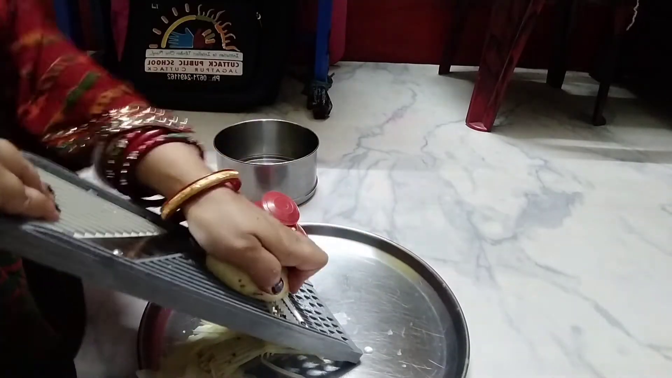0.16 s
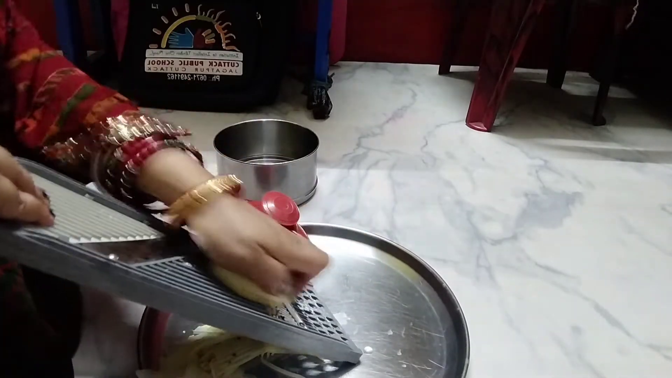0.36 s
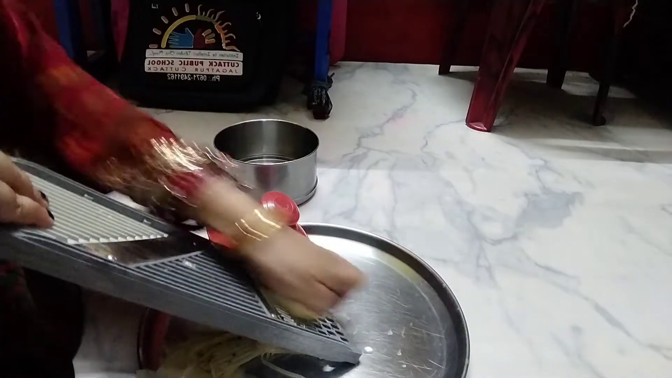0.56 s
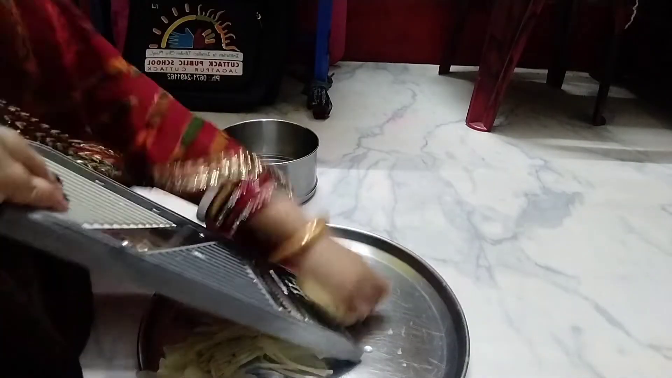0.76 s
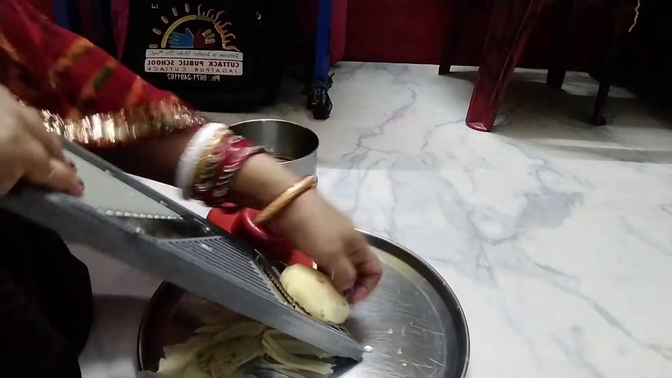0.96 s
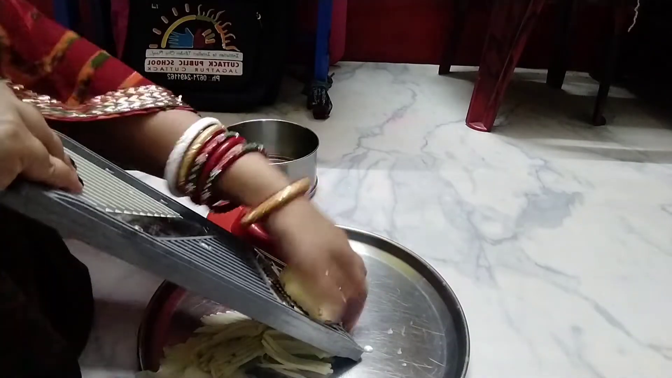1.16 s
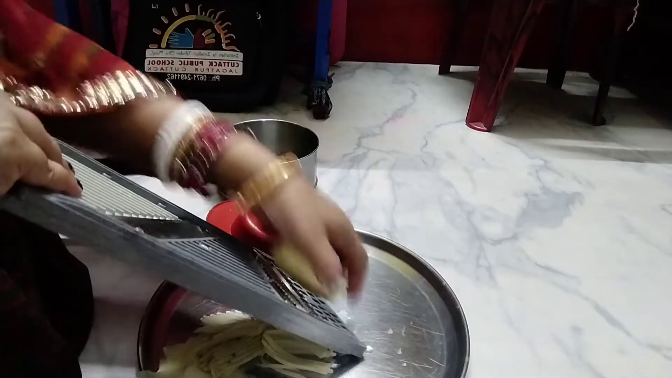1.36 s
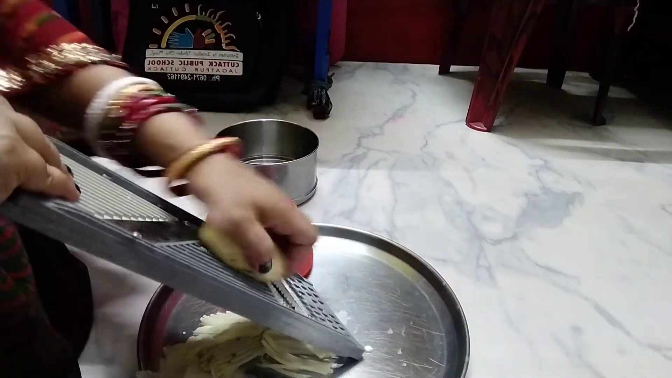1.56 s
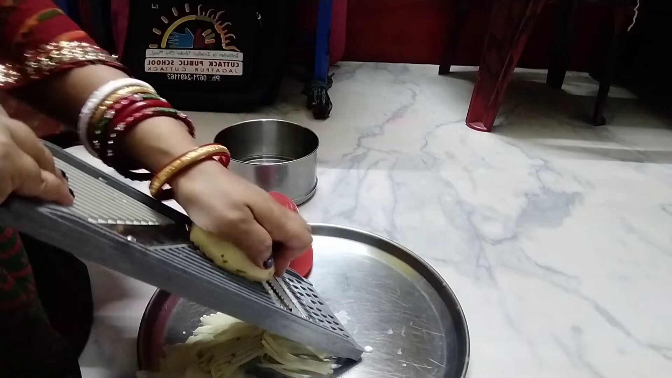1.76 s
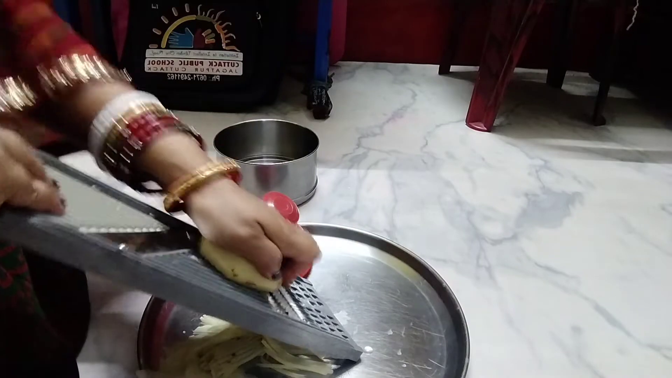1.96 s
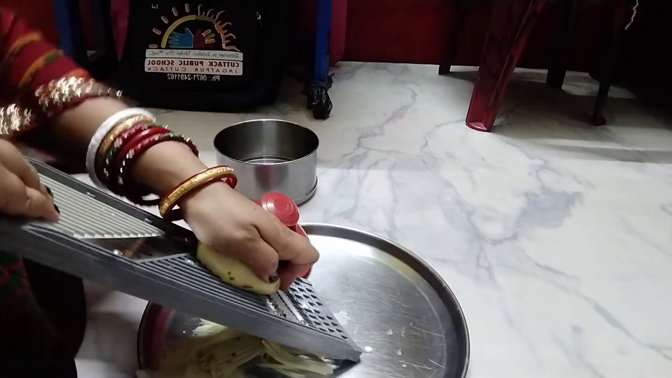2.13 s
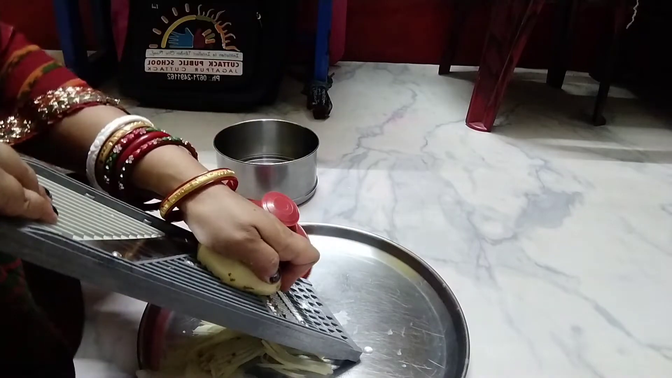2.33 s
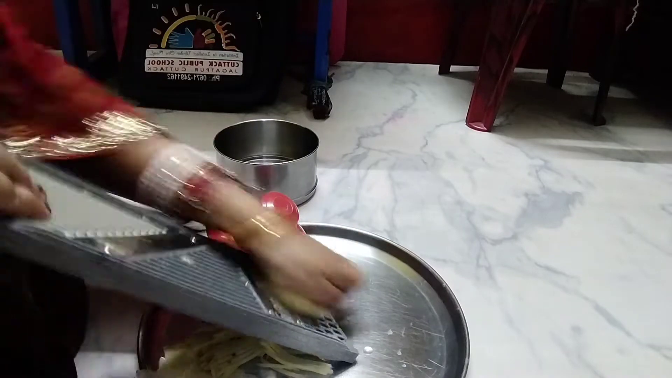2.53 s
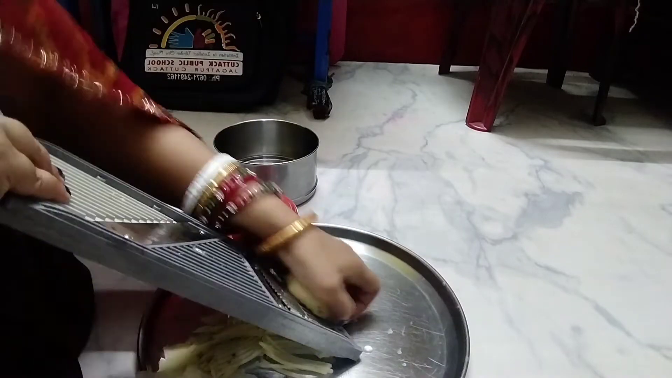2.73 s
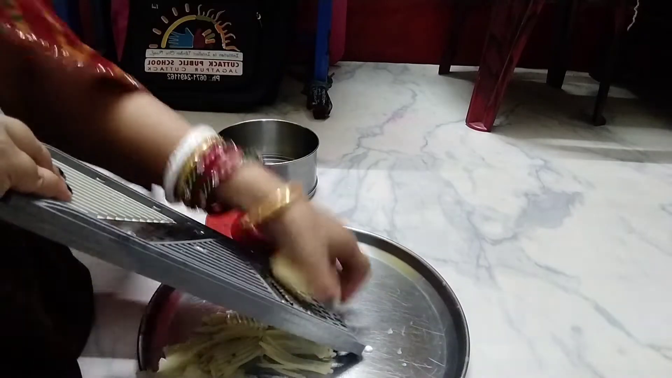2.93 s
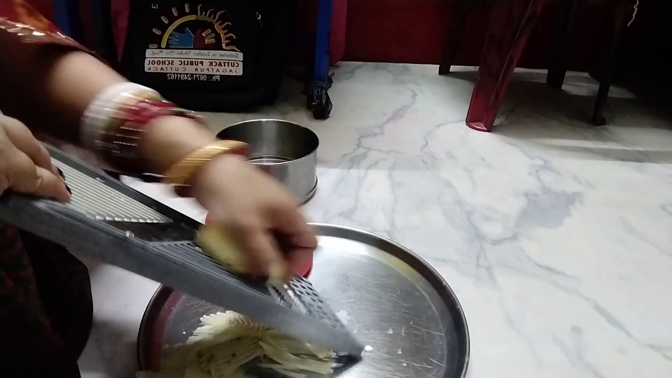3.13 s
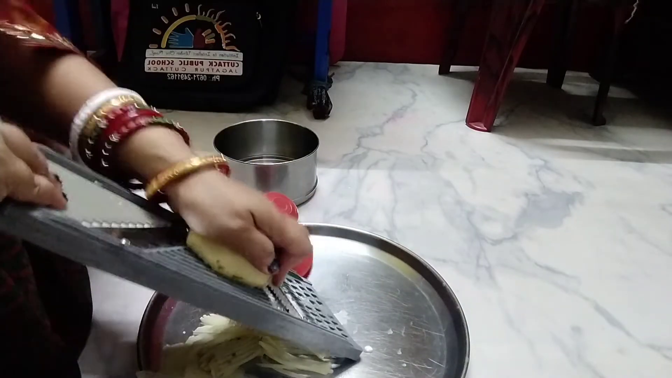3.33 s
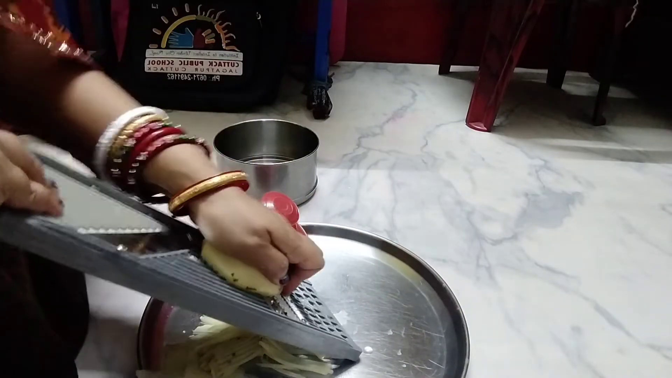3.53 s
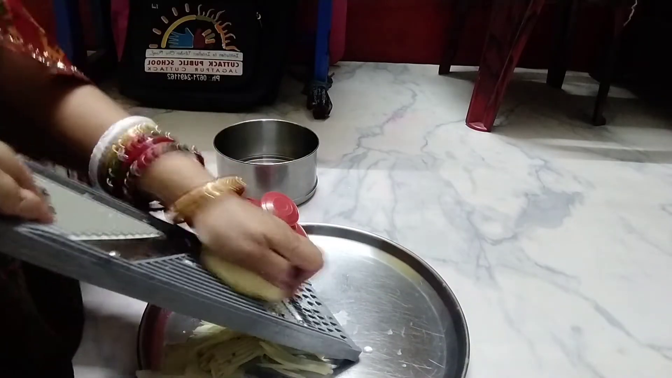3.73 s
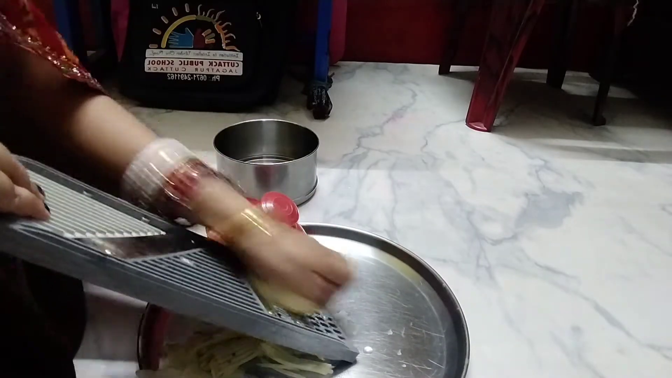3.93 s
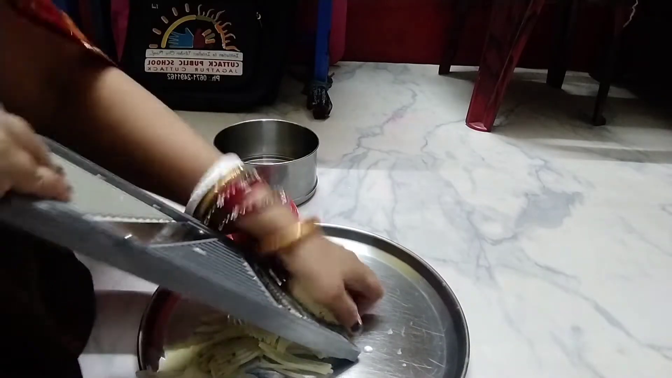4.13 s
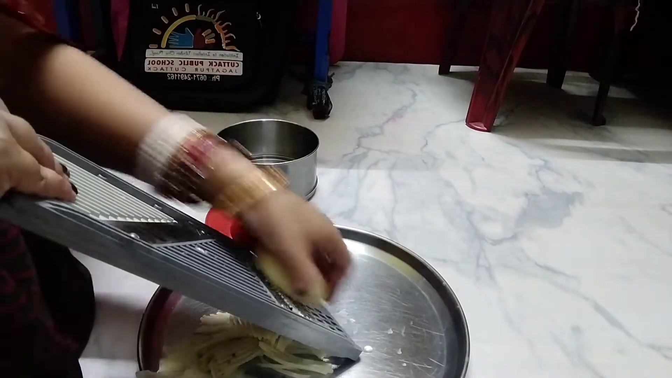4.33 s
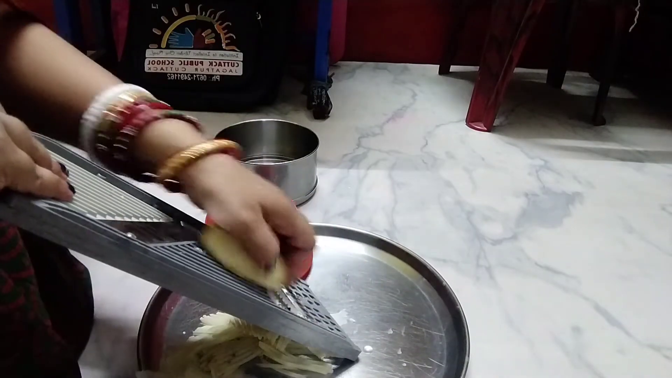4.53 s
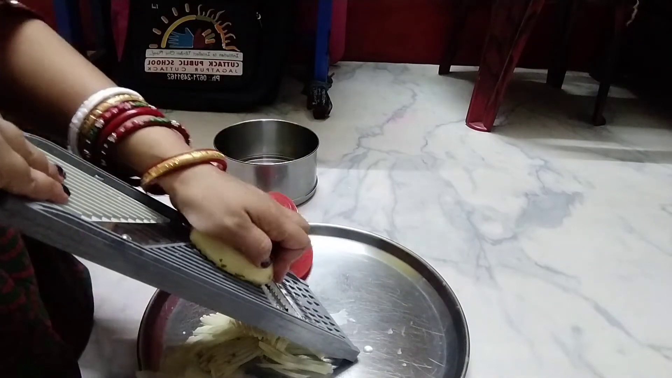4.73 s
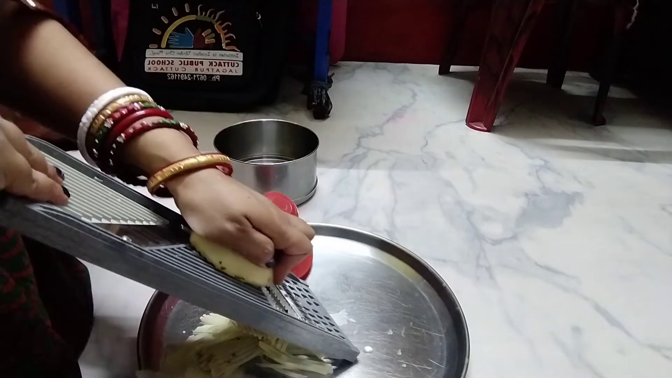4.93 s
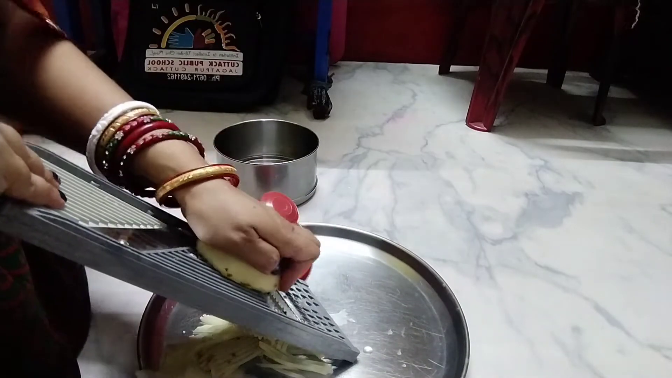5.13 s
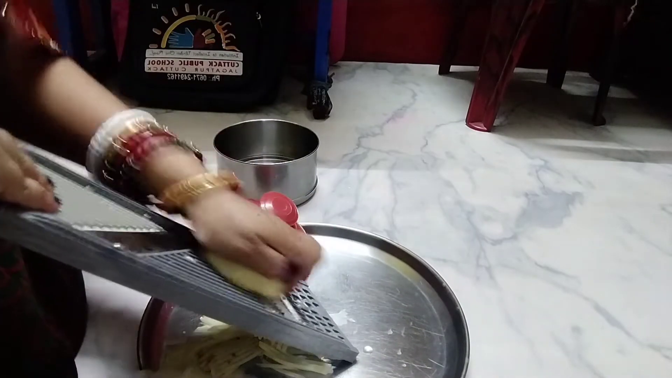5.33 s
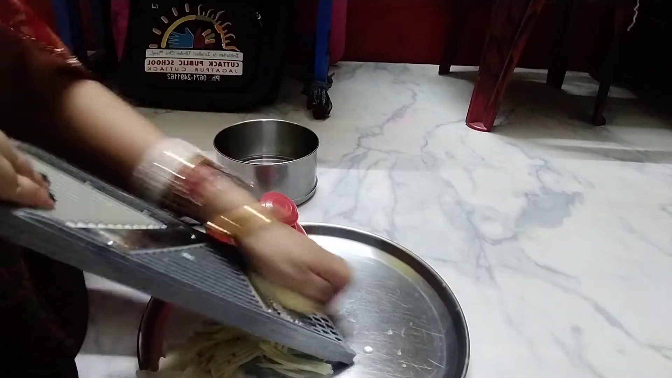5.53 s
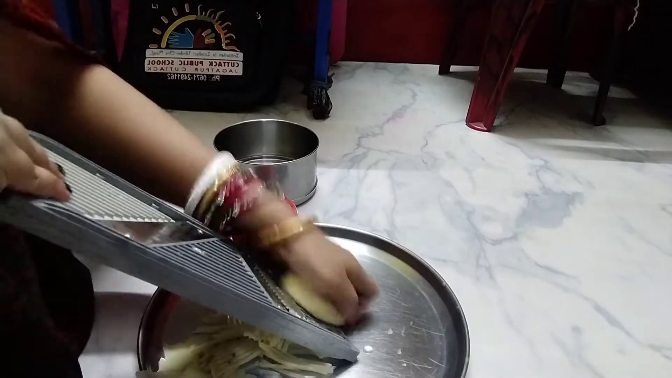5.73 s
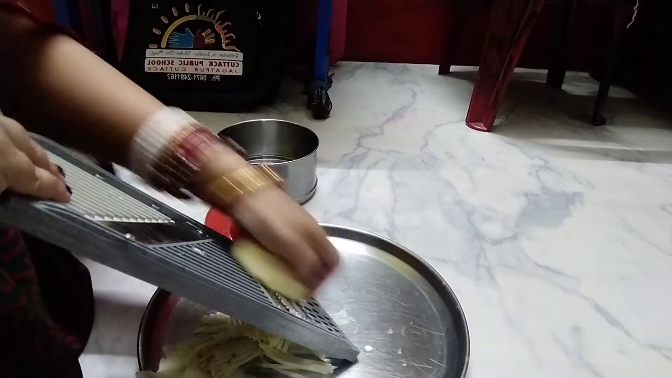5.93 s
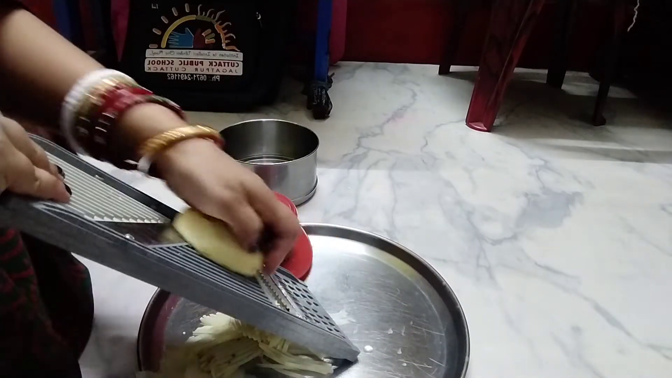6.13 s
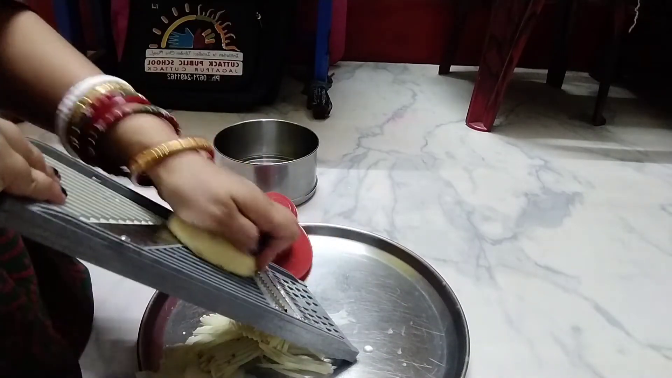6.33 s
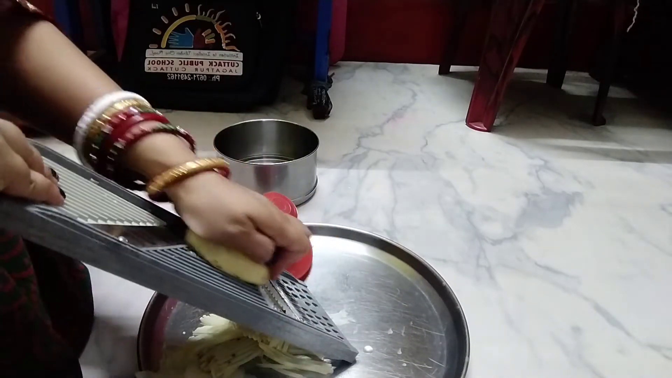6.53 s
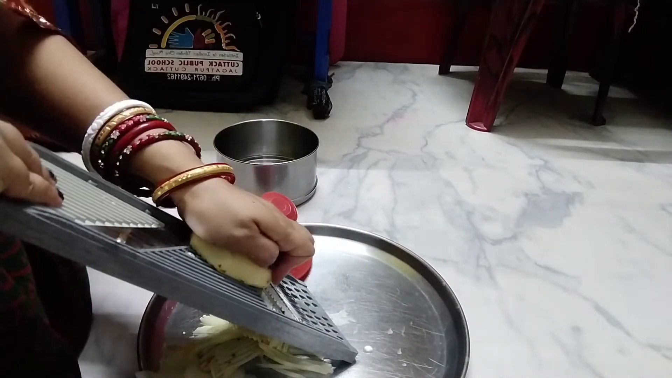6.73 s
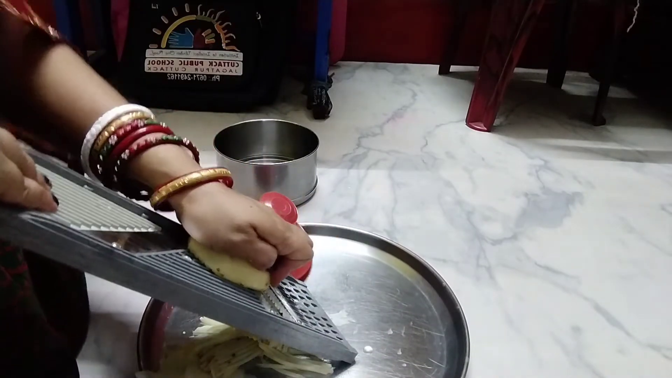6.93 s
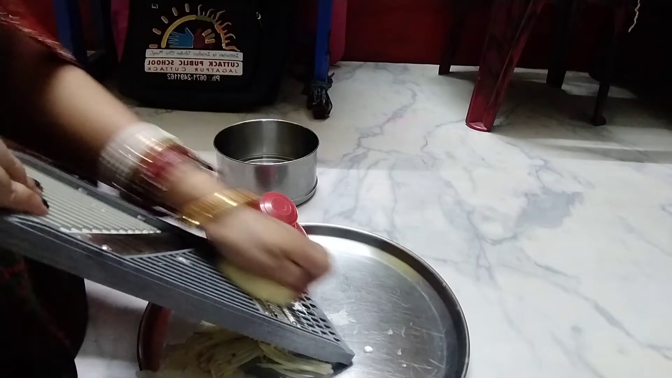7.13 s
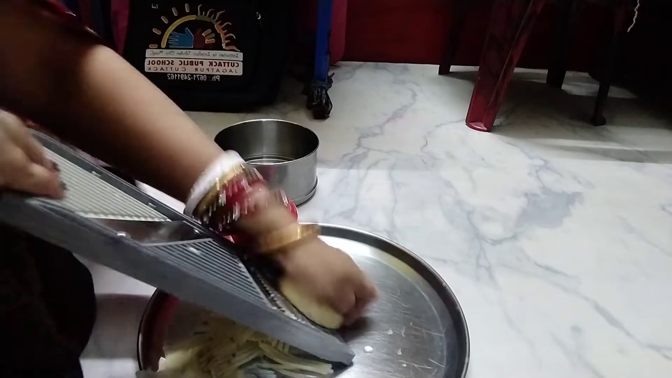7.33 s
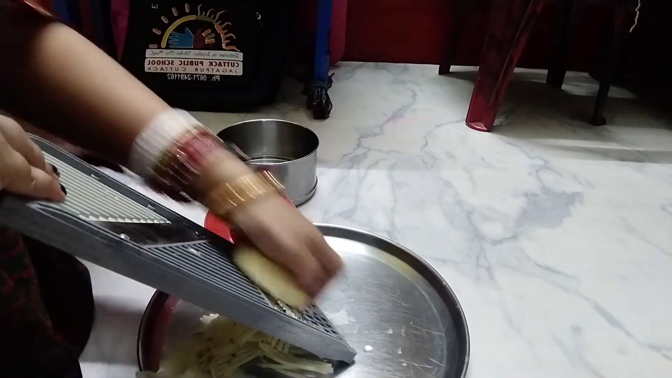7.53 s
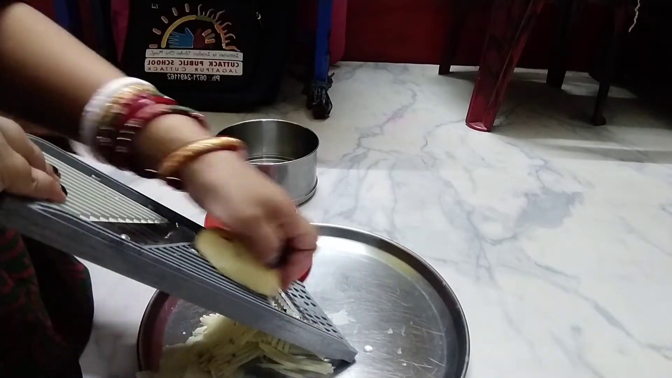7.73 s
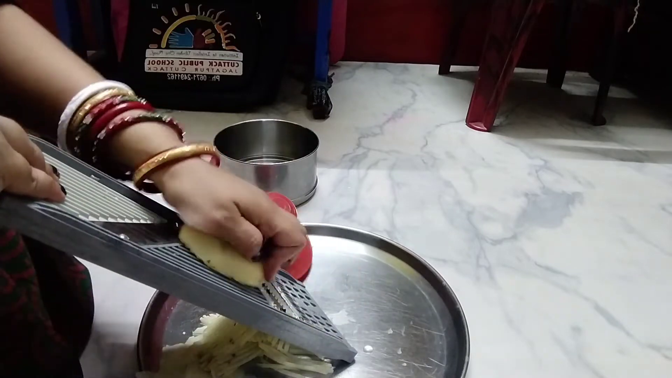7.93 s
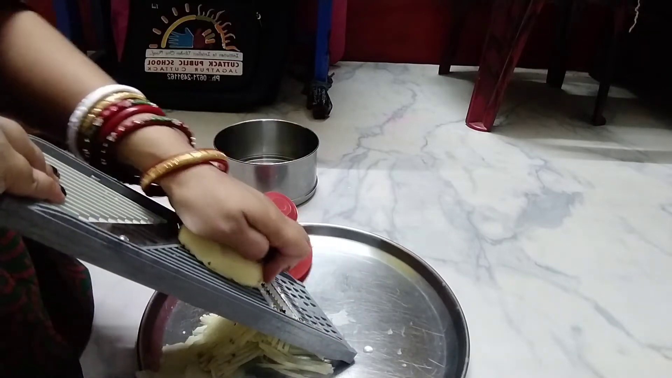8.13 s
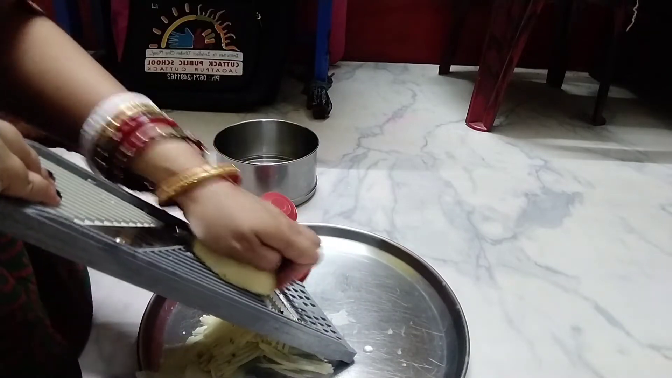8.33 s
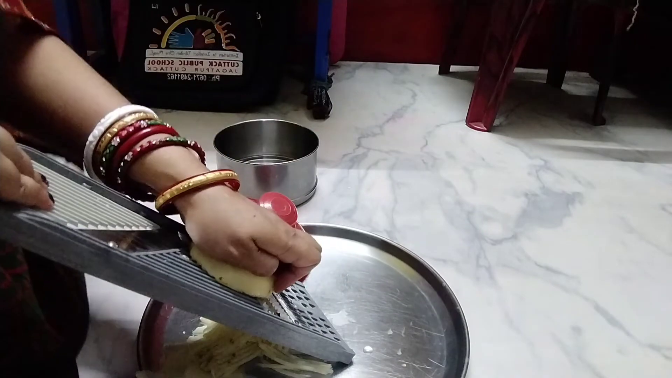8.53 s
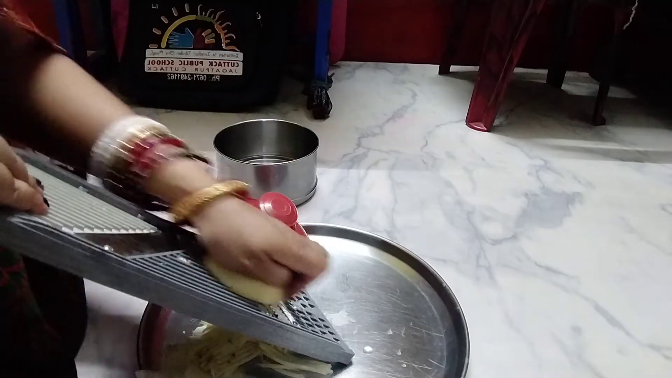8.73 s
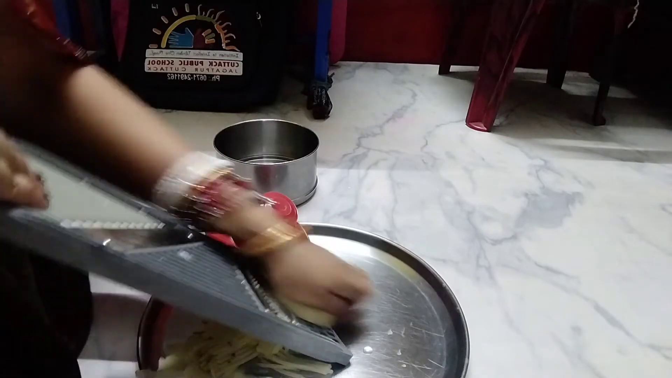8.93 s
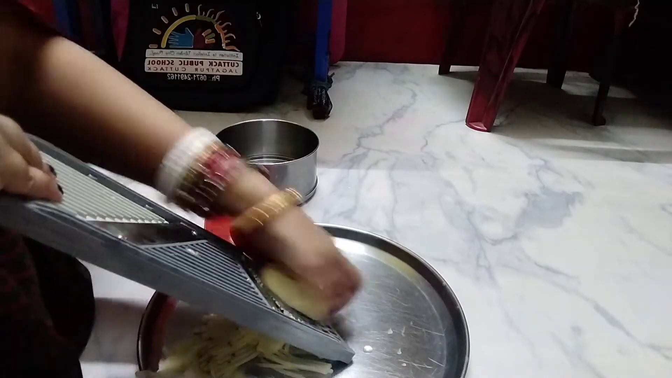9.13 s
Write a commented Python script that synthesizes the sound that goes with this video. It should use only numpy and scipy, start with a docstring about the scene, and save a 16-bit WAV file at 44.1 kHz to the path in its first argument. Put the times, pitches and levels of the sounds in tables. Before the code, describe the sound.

Wet, coarse slicing strokes scrape over steel blades with pauses between, bangles clinking and the slicer knocking a metal tray in a hard room.

```python
"""On a stone floor in a hard room, a raw potato is pushed down a steel slicer propped in a metal tray.
Each stroke tears wet cells on the blades (shaped noise bursts) and shakes plate and frame (resonances).
The potato scuffs as it is set down, the frame knocks, the tray's rim is tapped; glass and metal bangles clink.
Soft low tones swell briefly. A mono phone microphone hears it all, and its noise suppressor leaves
only scraps of the room's hum."""
import sys
import numpy as np
from scipy import signal
from scipy.fft import rfft, irfft, next_fast_len
from scipy.io import wavfile
from scipy.ndimage import uniform_filter1d, map_coordinates

SR = 44100
rng = np.random.default_rng(int(sys.argv[2]) if len(sys.argv) > 2 else 0)


def materialize(psi):
    """Save the field psi as 16-bit PCM at rate SR to the path in sys.argv[1].

    A 1-D psi becomes a single channel; in a 2-D psi each row is a channel.
    """
    bounded = np.clip(np.atleast_2d(psi).T, -1, 1)
    quanta = np.round(bounded * 32767).astype(np.int16)
    wavfile.write(sys.argv[1], SR, quanta)


N = 405279  # length [samples]


def amp(db):
    """Turns dB into gain."""
    return 10 ** (np.asarray(db) / 20)


def unit(x):
    """Scales x to rms 1."""
    return x / np.sqrt(np.mean(x ** 2) + 1e-20)


def along(points, hz):
    """Reads a curve of (frequency [Hz], value) points on a log frequency axis."""
    f, v = np.transpose(points)
    return np.interp(np.log(hz + 1), np.log(f + 1), v)


def filtered(x, response):
    """Shapes x with a complex response of frequency."""
    size = next_fast_len(N + SR // 2)  # padded, so that the end does not wrap to the start
    return irfft(rfft(x, size) * response(np.fft.rfftfreq(size, 1 / SR)), size)[..., :N]


def resonances(modes):
    """Causal response of (frequency [Hz], width [Hz], level [dB]) modes, with alternating signs."""
    def response(hz):
        total = 0
        for k, (centre, width, db) in enumerate(modes):
            damping = 1j * hz * width
            total = total + (-1) ** k * amp(db) * damping / (centre * centre - hz * hz + damping)
        return total
    return response


def wobble(rate):
    """A smooth random curve with this many knots a second."""
    knots = rng.standard_normal(int(N * rate / SR) + 4)
    return map_coordinates(knots, [np.arange(N) * rate / SR])


def crackle(spread_db):
    """Dense ruptures: most are tiny, a few stand out."""
    return rng.standard_normal(N) * amp(spread_db * rng.exponential(size=N))


def patchy(x, depth_db):
    """Gives x drifting bright and dull patches, as the contact shifts."""
    z = signal.stft(x, nperseg=256)[2]
    field = uniform_filter1d(rng.standard_normal(z.shape), 2, 0)  # over frequency
    field = uniform_filter1d(field, 14, 1)  # over time
    return signal.istft(z * amp(depth_db * unit(field)), nperseg=256)[1][:N]


def ring(modes, t, spread_db, blur):
    """One blow on (Hz, dB, t60 s) modes at new strengths; touching parts make each phase wander."""
    steps = rng.standard_normal((len(modes), len(t)))
    drift = uniform_filter1d(blur * np.cumsum(steps, 1), 40, 1)
    out = 0
    for (hz, db, t60), wander in zip(modes, drift):
        level_db = db + spread_db * rng.normal() - 60 * t / t60
        out = out + amp(level_db) * np.sin(2 * np.pi * hz * t + wander)
    return out


def add(track, s, sound):
    """Mixes a sound into the track at time s."""
    at = round(s * SR)
    track[at:at + len(sound)] += sound[:N - at]


# colour of the room's hum: (frequency [Hz], relative level per Hz [dB])
HUM_COLOUR = [(15, -52.5), (25, -21.5), (86, 3), (144, -1.5), (194, 6), (414, -7), (527, -1.5), (791, -10),
              (1040, -15), (1220, -7), (2090, -13.5), (3490, -21.5), (6850, -30.5), (13100, -31.5),
              (15800, -46)]
# lumps on that colour: (frequency [Hz], width [Hz], boost [dB])
HUM_LUMPS = [(91, 5.9, 1), (224, 76, 2), (610, 87, 4.5), (840, 120, 8.5), (1022, 64, 16), (12900, 70, 14.5)]


def hum():
    """The room's hum: noise made lumpy in frequency, whose level flickers, most of all in the bass."""
    def colour(hz):
        lumps_db = sum(db * np.exp(-.5 * ((hz - c) / w) ** 2) for c, w, db in HUM_LUMPS)
        return amp(along(HUM_COLOUR, hz) + lumps_db)

    steady = filtered(rng.standard_normal(N), colour)
    z = signal.stft(steady, nperseg=512)[2]
    field = unit(uniform_filter1d(rng.standard_normal(z.shape), 8, 1))
    depth_db = 1.6 * np.exp(-np.linspace(0, SR / 2, len(z)) / 1500)[:, None]
    flickering = signal.istft(z * amp(depth_db * field), nperseg=512)[1][:N]
    return amp(-58.5) * unit(flickering)


# reverb decay: (frequency [Hz], t60 [s])
ROOM_DECAY = [(200, .8), (1000, .9), (4000, .9), (15000, .8)]


def room(x):
    """Echo of x: noise tails in which each frequency dies at its own speed; a new one every third of a second."""
    out, step = np.zeros(N), SR // 3
    for at in range(0, N, step):
        hz, t, z = signal.stft(rng.standard_normal(SR * 2 // 3), SR, nperseg=256)
        decay = amp(-60 * t / along(ROOM_DECAY, hz)[:, None])
        tail = signal.istft(z * decay, SR, nperseg=256)[1]
        echo = signal.fftconvolve(x[at:at + step], tail / np.linalg.norm(tail))
        add(out, at / SR + .012, echo)
    return out


# the clearest soft low tones: (time of the peak [s], frequency [Hz], peak level [dB], length at half height [s])
SWELLS = [(0.075, 1050, -56, 0.04), (0.245, 963, -53, 0.04), (0.338, 690, -49.5, 0.039),
          (0.341, 1099, -50.5, 0.023), (0.455, 260, -52.5, 0.03), (0.507, 284.5, -52, 0.03),
          (1.79, 300, -50.5, 0.05), (1.92, 258, -51, 0.038), (2.207, 983, -43.5, 0.011),
          (2.374, 1126, -52, 0.042), (2.482, 199.4, -50.5, 0.03), (2.883, 190.5, -54, 0.07),
          (3.06, 527, -48, 0.025), (3.148, 270, -51.5, 0.12), (3.168, 572, -45.5, 0.012),
          (3.306, 1056, -56.5, 0.025), (3.425, 360, -51, 0.025), (3.616, 557, -50, 0.019),
          (3.747, 573.5, -51.5, 0.04), (3.59, 835, -54, 0.025), (4.045, 622, -49, 0.034),
          (4.356, 825, -52, 0.031), (4.385, 1079, -54, 0.05), (4.408, 183, -48, 0.024),
          (4.465, 190.4, -51, 0.03), (4.587, 1090, -54, 0.035), (4.662, 609.7, -50, 0.02),
          (4.809, 399, -54, 0.018), (5.11, 834, -54, 0.02), (5.171, 1092, -56, 0.088),
          (5.23, 1052, -50.5, 0.03), (5.405, 829, -53, 0.02), (6.148, 536.4, -52.5, 0.025),
          (6.225, 959, -50, 0.012), (6.269, 1100, -54, 0.03), (6.42, 838, -52.5, 0.027),
          (6.519, 667, -52, 0.03), (6.59, 1000, -56, 0.023), (6.599, 675, -50, 0.019),
          (7.02, 110.2, -49.5, 0.019), (7.025, 606, -47.5, 0.018), (7.039, 1063, -49.5, 0.016),
          (7.086, 1029, -50.5, 0.025), (7.516, 1089, -53.5, 0.027), (7.57, 571, -49, 0.013),
          (8.326, 560, -55.5, 0.02), (8.457, 652, -55, 0.02), (8.777, 546, -53.5, 0.027)]
# fainter ones come by chance: pitches [Hz], mean level [dB], mean length [s]
FAINT_BANDS_HZ, FAINT_DB, FAINT_S = (268, 412, 553, 820, 1090), -61, 0.026


def swells(count=45):
    """Each swell is a soft tone with an unsteady phase; count fainter ones fall at random."""
    out, faint = np.zeros(N), []
    for when, band, level, length in rng.random((count, 4)):
        faint.append((FAINT_S * 2 + when * (N / SR - 1),
                      FAINT_BANDS_HZ[int(band * len(FAINT_BANDS_HZ))],
                      FAINT_DB + 6 * (level - .5),
                      FAINT_S * (.5 + length)))
    for s, hz, db, length in SWELLS + faint:
        t = np.arange(round(2 * length * SR)) / SR
        wander = .03 * np.cumsum(rng.standard_normal(SR // 4))[:len(t)]
        tone = np.sin(2 * np.pi * hz * t + wander)
        add(out, s - t[-1] / 2, amp(db) * np.hanning(len(t)) * tone)
    return out


# wet face creeping over the plate:
# (start [s], end [s], film level at start [dB], film level at end [dB], bangle rub at end, above the film [dB])
CREEP = [(0.11, 0.22, -72.5, -59.5, -6.5), (0.33, 0.44, -70.5, -77, -6), (0.477, 0.54, -75.5, -58, -20.5),
         (2.062, 2.12, -68, -66, -10.5), (3.542, 3.6, -79, -58.5, 3.5), (5.234, 5.32, -72, -79, 0),
         (5.39, 5.46, -74.5, -62, -20.5), (6.618, 6.78, -60.5, -71, 1.5), (8.415, 8.49, -60, -76, -13),
         (8.772, 8.84, -67.5, -62.5, -0.5)]
# colour of the film's ticks, applied twice: (frequency [Hz], width [Hz], relative level per pass [dB])
FILM = [(10100, 1900, 0.5), (11450, 2300, 1), (12000, 1200, 2), (14600, 760, -9.5)]
# colour of the rubbing bangles, applied twice: (frequency [Hz], width [Hz], relative level per pass [dB])
RUB = [(4770, 350, -5.5), (5200, 610, -5.5)]
CREEP_SAG_DB, CREEP_RISE_S, CREEP_FADE_S = 2.5, 0.013, 0.034  # it slackens halfway
RUB_GROWS_DB = 7  # the bangles rub harder toward the end of a creep


def creep():
    """The juice film ticks as it lets go and the bangles grate on each other: crackle through resonances."""
    t, gains = np.arange(N) / SR, np.zeros((2, N))
    for start, end, first_db, last_db, rub_db in CREEP:
        times = (start - CREEP_RISE_S, start, (start + end) / 2, end, end + CREEP_FADE_S)
        middle_db = (first_db + last_db) / 2 - CREEP_SAG_DB
        levels = (first_db - 17, first_db, middle_db, last_db, last_db - 18.5)
        film_db = np.interp(t, times, levels, -200, -200)
        still_to_go = (end - t).clip(0, 1) / (end - start)
        gains += amp([film_db, film_db + rub_db - RUB_GROWS_DB * still_to_go])
    ticks = amp(4.5 * wobble(150)) * crackle(2.5)
    film, rub = [unit(filtered(ticks, lambda hz: resonances(m)(hz) ** 2)) for m in (FILM, RUB)]
    return gains[0] * film + gains[1] * rub


# light taps on the tray's rim: (time [s], level [dB], pitch [share of the usual], overtone tilt [dB per octave])
TAPS = [(0.0014, -56.5, 0.96, -3), (3.4164, -44, 0.94, 8.5), (4.7986, -43.5, 0.94, -1.5),
        (6.6144, -52, 0.9, 10), (8.1188, -55, 0.96, -5.5)]
# ringing of the rim: (frequency at the usual pitch [Hz], level before tilt [dB], t60 [s])
RIM = [(2360, -1, 0.098), (2446, 6.5, 0.098), (2950, -12, 0.043), (3800, -7, 0.027), (3730, -0.5, 0.02),
       (4420, 2, 0.01), (5013, -10, 0.033), (5123, -20.5, 0.01), (5870, -17, 0.026), (6996, -13, 0.003),
       (8350, -17.5, 0.0056)]
# body of the loose rim; taps pass it twice, scuffs once: (frequency [Hz], width [Hz], level per pass [dB])
RIM_BODY = [(2370, 760, 3.5), (3620, 920, 1.5), (4550, 1100, -2)]


def taps():
    """The rim rings a little higher or lower with what rests on it, and clacks: decaying sines and noise."""
    out, clack, t = np.zeros(N), np.zeros(N), np.arange(SR // 4) / SR
    rise = 1 - np.exp(-t / .0015)
    for s, db, pitch, tilt_db in TAPS:
        modes = [(hz * pitch, level + tilt_db * np.log2(hz / RIM[0][0]), t60) for hz, level, t60 in RIM]
        add(out, s, amp(db) * ring(modes, t, spread_db=2, blur=.1) * rise)
        add(clack, s, amp(db - 60 * t / 0.18) * rng.standard_normal(len(t)))
    return out + filtered(clack, lambda hz: resonances(RIM_BODY)(hz) ** 2)


# bangle clinks: (time [s], level [dB], lowest ring above it [dB])
CLINKS = [(0.8674, -43.5, 1), (0.889, -48, -5), (0.9194, -50.5, -5), (0.9762, -50.5, -6.5),
          (1.277, -54.5, -8), (2.8591, -44, -1), (2.922, -39.5, -10.5), (2.9394, -52, -16),
          (2.9637, -51, -18.5), (3.7044, -43, -13), (4.2024, -48.5, -7), (4.2571, -33.5, -16),
          (4.2937, -49.5, -15), (4.334, -54, 5.5), (4.4176, -39, -13), (5.5594, -47, -3.5),
          (5.7901, -31.5, -12.5), (5.9023, -43.5, -8.5), (5.9233, -48.5, -19.5), (5.9318, -45.5, -22),
          (5.954, -40.5, -17.5), (5.9674, -49, -9.5), (7.3661, -29.5, -12), (7.4906, -42, -13),
          (7.5573, -41, -6)]
# ringing of the bangles: (frequency [Hz], level above the clink [dB], t60 [s])
BANGLE = [(4900, -4, 0.03), (6103, 4.5, 0.0057), (6430, -6.5, 0.013), (8165, 5.5, 0.0088),
          (9030, -3, 0.012), (9800, -18.5, 0.036), (10680, -2.5, 0.045), (11300, -17, 0.027),
          (12800, -27.5, .03), (13840, -25, .03), (15000, -15.5, 0.036)]
# lowest ring, of the widest bangle: (frequency [Hz], t60 [s])
LOW_RING = (2960, .07)
# faint pings of single bangles: (time [s], peak level [dB], frequency [Hz], t60 [s])
PINGS = [(1.371, -66.5, 5470, 0.14), (1.698, -59.5, 927, 0.18), (1.929, -66.5, 5990, 0.077),
         (3.045, -72.5, 2200, 0.1), (3.065, -62, 3936, 0.092), (6.121, -61.5, 4910, 0.18),
         (6.518, -69, 10290, 0.14), (7.898, -70, 3860, .1), (8.55, -64, 4800, 0.24),
         (8.732, -55, 3400, 0.086), (8.773, -69, 3923, 0.11)]
CHATTER_S, CHATTER_DB = .03, -22  # neighbours touch after each clink: mean delay, level under it


def bangles():
    """Each clink rings decaying sines at new strengths, with a bright noise tick; a fainter touch follows."""
    out, t = np.zeros(N), np.arange(SR // 4) / SR
    low_hz, low_t60 = LOW_RING
    delays = CHATTER_S * (.5 + rng.random(len(CLINKS)))
    chatter = [(s + delay, db + CHATTER_DB, low_db) for (s, db, low_db), delay in zip(CLINKS, delays)]
    for s, db, low_db in CLINKS + chatter:
        rings = ring(BANGLE + [(low_hz, low_db, low_t60)], t, spread_db=4, blur=.08)
        tick = amp(-6 - 60 * t / 0.019) * np.diff(rng.standard_normal(len(t) + 1))
        add(out, s, amp(db) * (rings + tick) * (1 - np.exp(-t / 0.00091)))
    for s, db, hz, t60 in PINGS:
        ping = ring([(hz, db, t60)], t, spread_db=1, blur=.06)
        add(out, s, ping * (1 - np.exp(-t / .004)))
    return out


# knocks of the slicer on the tray:
# (time [s], drive level [dB], thud above it [dB], crack above it [dB], shudder above it [dB])
KNOCKS = [(0.817, -16.5, 0.5, -19.5, -16), (0.871, -27.5, -15, -15, -20.5),
          (0.9034, -19, -16, -18.5, -19.5), (1.1303, -5.5, 7, -30, -18), (1.762, -15.5, 8, -37.5, -14),
          (1.8053, -27, 2, -34, -23), (2.7344, -12, -4.5, -15, -22.5), (2.751, -16, 1, -19, -20),
          (4.1272, -8, -6, -12, -25.5), (5.7249, -15.5, -10, -16.5, -9.5), (7.4298, -14, -6, -16, -26),
          (7.438, -11.5, -7, -10.5, -18), (8.875, -21, -22.5, -39, -24), (9.0743, -10, -1, -29, -18.5),
          (9.1252, -20, 7, -7.5, -25)]
# resonances of the tray: (frequency [Hz], width [Hz], level [dB])
TRAY = [(1920, 330, -2), (2640, 450, -4.5), (2910, 320, -3), (3680, 130, -12.5), (3798, 120, -5.5),
        (4880, 470, -8), (6100, 300, -12.5), (7400, 600, -21.5)]
# resonances of the thud in the frame: (frequency [Hz], width [Hz], level [dB])
THUD = [(154.5, 42, -15.5), (325, 230, -18), (590, 150, -3), (980, 430, -9.5), (1360, 460, -10.5)]
FIRST_BLOW_DB = 13  # the first contact above its rattle
KNOCK_RISE_S, KNOCK_T60_S, SHUDDER_T60_S = .0006, .028, 0.41


def knocks():
    """Each knock is a noisy rattle of contacts into tray and frame, with a crack; the slicer shudders on."""
    blows, t = np.zeros((3, N)), np.arange(SR // 2) / SR
    rise = 1 - np.exp(-t / KNOCK_RISE_S)
    for s, db, thud_db, crack_db, shudder_db in KNOCKS:
        shape = (amp(-60 * t / KNOCK_T60_S) + amp(shudder_db - 60 * t / SHUDDER_T60_S)) * rise
        for track, above_db in zip(blows, (0, thud_db, crack_db)):
            add(track, s, amp(db + above_db) * shape * rng.standard_normal(len(t)))
            add(track, s + 2 * KNOCK_RISE_S, amp([db + above_db + FIRST_BLOW_DB]))

    def dull(hz):  # a broad contact gives little treble
        return 1 / (1 + 1j * hz / 6000) ** 3

    tray = filtered(blows[0], lambda hz: dull(hz) * resonances(TRAY)(hz))
    thud = filtered(blows[1], lambda hz: dull(3 * hz) * resonances(THUD)(hz))
    crack = filtered(blows[2], lambda hz: amp(along(FIZZ, hz)))
    return tray + thud + crack


# the potato scuffs the plate: (time [s], level before the rise [dB], fizz above it [dB])
SCUFFS = [(0.2225, -31, -8), (2.1231, -34.5, -1), (3.5972, -31, -7.5), (5.1971, -36, -10.5),
          (8.4941, -40.5, -4.5), (8.526, -51, -3)]
SCUFF_RISE_S, SCUFF_T60_S = 0.0039, 0.06
SCUFF_TAIL_DB, SCUFF_TAIL_T60_S = -18.5, .35  # the loose rim rattles on


def scuffs():
    """A short slide: the same tearing noise under a quick rise and decay; the rim rattles after it."""
    coarse, fine, rattle = np.zeros((3, N))
    t = np.arange(SR // 2) / SR
    rise = (1 - np.exp(-t / SCUFF_RISE_S)) ** 2
    for s, db, fizz_db in SCUFFS:
        add(coarse, s, amp(db - 60 * t / SCUFF_T60_S) * rise)
        add(fine, s, amp(db + fizz_db - 60 * t / SCUFF_T60_S) * rise)
        add(rattle, s, amp(db + SCUFF_TAIL_DB - 60 * t / SCUFF_TAIL_T60_S) * rise)
    rasp, fizz = torn_cells()
    rim = patchy(filtered(crackle(spread_db=1.5), resonances(RIM_BODY)), depth_db=1.5)
    return coarse * rasp + fine * fizz + rattle * unit(rim)


# colour of the coarse rasp: (frequency [Hz], relative level per Hz [dB])
TEAR = [(820, -32), (1400, -20.5), (1610, -15), (2120, 0.5), (2320, -2), (2620, -1.5), (2860, -0.5),
        (3480, -2), (6240, -7.5), (8000, -22), (10400, -34.5), (17600, -120)]
# colour of the fine fizz, and of the cracks in the knocks: (frequency [Hz], relative level per Hz [dB])
FIZZ = [(3530, -19.5), (6000, -5.5), (9480, -7), (10700, -6), (14900, -15.5), (15800, -29)]


def torn_cells():
    """Wet cells burst on the blades: crackle shaped to a coarse rasp and a fine fizz, which snag together."""
    snag = amp(.9 * wobble(45) + 1.4 * wobble(220) + 1.2 * wobble(900))
    rasp = filtered(snag * crackle(spread_db=2.5), lambda hz: amp(along(TEAR, hz)))
    fizz = filtered(snag * crackle(spread_db=1.5), lambda hz: amp(along(FIZZ, hz)))
    return unit(patchy(rasp, depth_db=2.5)), unit(patchy(fizz, depth_db=2.0))


# how hard each stroke tears, one list a stroke: (time [s], level [dB])
STROKES = [
    [(0.53, -72), (0.552, -44.5), (0.582, -36), (0.63, -41.5), (0.72, -37), (0.8, -44), (0.896, -58.5),
     (1.0, -62.5)],
    [(2.49, -78), (2.518, -43), (2.554, -34.5), (2.606, -43), (2.672, -39), (2.766, -41.5), (2.808, -62.5),
     (2.9, -67.5)],
    [(3.9, -77), (3.918, -41.5), (3.95, -33.5), (4.008, -48.5), (4.03, -36.5), (4.082, -36.5), (4.136, -34),
     (4.222, -58.5), (4.3, -84)],
    [(5.44, -87), (5.468, -42.5), (5.5, -33), (5.548, -50), (5.616, -57.5), (5.634, -34.5), (5.68, -35.5),
     (5.734, -38.5), (5.872, -57), (5.9, -75)],
    [(7.08, -84.5), (7.134, -50.5), (7.19, -72.5), (7.212, -38), (7.248, -34), (7.312, -40), (7.362, -37),
     (7.446, -50), (7.462, -58), (7.55, -72)],
    [(8.844, -69), (8.864, -37), (8.88, -32), (8.894, -37.5), (8.958, -35), (9.03, -37), (9.07, -37),
     (9.13, -49), (9.19, -81.5)],
]
# one row a stroke: (blades bite [s], potato runs off them [s], fizz above the tearing at the run-off [dB],
# plate level [dB] and frame level [dB] just before the run-off, frame level as it springs back [dB])
CUTS = [(0.558, 0.8, -2, -49, -50, -40), (2.51, 2.743, 0.5, -44, -56.5, -41),
        (3.917, 4.117, -2.5, -45.5, -53.5, -41), (5.468, 5.721, -3, -45.5, -64, -40.5),
        (7.222, 7.425, -1, -50, -55.5, -43.5), (8.863, 9.048, -4, -46.5, -62.5, -40.5)]
# the blades as they first bite, applied twice: (frequency [Hz], width [Hz], relative level per pass [dB])
BITE = [(2200, 720, -0.5), (3410, 480, 1.5)]
# blade plate, applied twice: (frequency [Hz], width [Hz], relative level per pass [dB])
PLATE = [(816, 130, 6), (1084, 140, 8), (1267, 100, 9), (1370, 800, 4.5)]
# slicer frame, applied twice: (frequency [Hz], width [Hz], relative level per pass [dB])
FRAME = [(280, 100, -3), (434, 270, -2.5), (564, 110, 4), (687.3, 98, -1)]
FIZZ_GROWS_DB, PLATE_GROWS_DB, FRAME_GROWS_DB = 3, 8.5, 9  # from the bite to the run-off
FIZZ_FALLS, PLATE_FALLS, FRAME_FALLS = 30, 97, 130  # after the run-off [dB per s]
BITE_DB, BITE_FADES_DB = -8.5, 17.5  # above the tearing; lost by the run-off
SHAKE_FOLLOWS = .6  # share of the tearing's dB swings that the metal follows
PLATE_STIFF = 1.14  # the plate rings this much higher while the potato is still near its held end
SPRING_RISE_S = 0.0078


def strokes():
    """Deeper in the cut the fizz grows and metal shakes harder and lower; at the run-off the frame springs back."""
    t, gains = np.arange(N) / SR, np.zeros((6, N))
    for rows, (bite, off, fizz_db, plate_db, frame_db, spring_db) in zip(STROKES, CUTS):
        tear_db = np.interp(t, *np.transpose(rows), -200, -200)
        left = np.clip((off - t) / (off - bite), 0, 1)  # share of the cut still to come
        since = np.clip(t - off, 0, None)  # seconds after the run-off
        cutting = t < off
        swing_db = SHAKE_FOLLOWS * (tear_db - np.interp(off, t, tear_db))
        fizz_level = tear_db + fizz_db - FIZZ_GROWS_DB * left - FIZZ_FALLS * since
        bite_level = tear_db + BITE_DB - BITE_FADES_DB * (1 - left)
        released_db = spring_db + (frame_db - spring_db) * np.exp(-since / SPRING_RISE_S)
        frame_level = np.where(cutting, frame_db + swing_db - FRAME_GROWS_DB * left,
                               released_db - FRAME_FALLS * since)
        plate_level = np.where(cutting, plate_db + swing_db - PLATE_GROWS_DB * left,
                               plate_db - PLATE_FALLS * since)
        gains[:4] += amp([tear_db, fizz_level, bite_level, frame_level])
        gains[4:] += amp(plate_level) * np.sqrt([left, 1 - left])  # crossfade from stiff to free plate
    rasp, fizz = torn_cells()
    blades = unit(filtered(rasp, lambda hz: resonances(BITE)(hz) ** 2))

    def shaken(modes, higher):
        drive = amp(3.5 * wobble(50)) * crackle(3)
        return unit(filtered(drive, lambda hz: resonances(modes)(hz / higher) ** 2))

    frame, stiff_plate, free_plate = shaken(FRAME, 1), shaken(PLATE, PLATE_STIFF), shaken(PLATE, 1)
    return np.sum(gains * np.array([rasp, fizz, blades, frame, stiff_plate, free_plate]), axis=0)


def scene():
    """Everything near, its echo, the hum and the swells, alike on both channels."""
    near = strokes() + scuffs() + creep() + knocks() + taps() + bangles()
    return np.tile(near + amp(-19.0) * room(near) + hum() + swells(), (2, 1))


def suppress(x, margin_db, depth_db, attack_s, release_s):
    """Turns each narrow band down unless it stands above its usual level; chance peaks of the hum slip through."""
    size, hop = 512, 64
    z = signal.stft(x, nperseg=size, noverlap=size - hop)[2]
    frames, keep = round(attack_s * SR / hop), np.exp(-hop / SR / release_s)
    power = np.abs(uniform_filter1d(np.abs(z) ** 2, frames, 1))
    # a band closes more slowly than it opens
    power = np.maximum(power, signal.lfilter([1 - keep], [1, -keep], power, axis=1))
    usual = np.percentile(power, 35, axis=1, keepdims=True)
    gain = np.clip(1 - amp(2 * margin_db) * usual / (power + 1e-20), amp(depth_db), 1)
    smooth_gain = uniform_filter1d(gain, frames, 1)
    return signal.istft(z * smooth_gain, nperseg=size, noverlap=size - hop)[1][:N]


TOP_HZ = 15800  # band limit


def record(dry):
    """One microphone that is weak in the bass, a noise suppressor, nothing above the band limit."""
    heard = filtered(dry[0], lambda hz: 1j * hz / (1j * hz + 60))
    quiet = suppress(heard, margin_db=5.8, depth_db=-11, attack_s=.025, release_s=.03)
    return np.tile(filtered(quiet, lambda hz: hz < TOP_HZ), (2, 1))


dry = scene()
out = record(dry)
materialize(out)
```